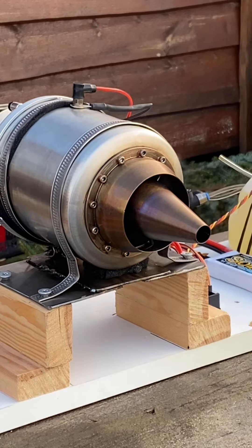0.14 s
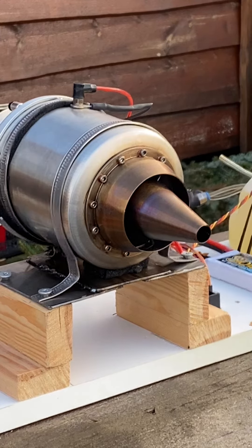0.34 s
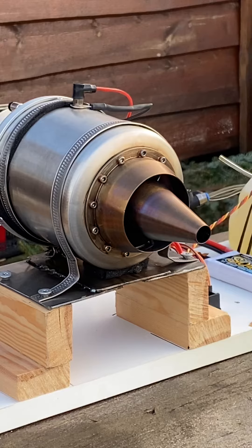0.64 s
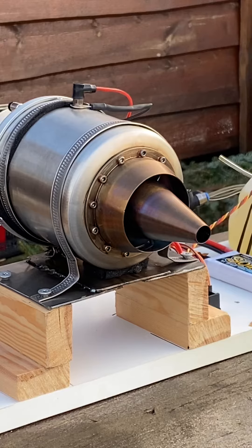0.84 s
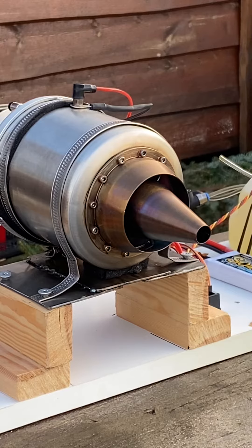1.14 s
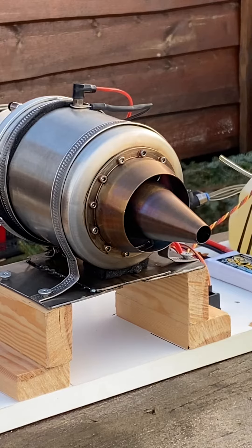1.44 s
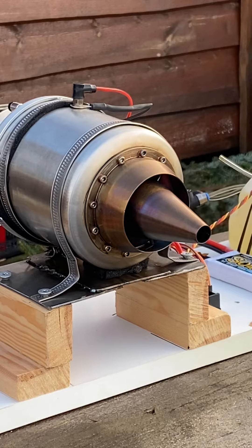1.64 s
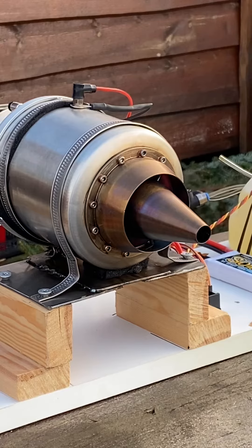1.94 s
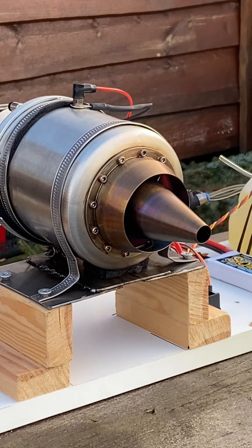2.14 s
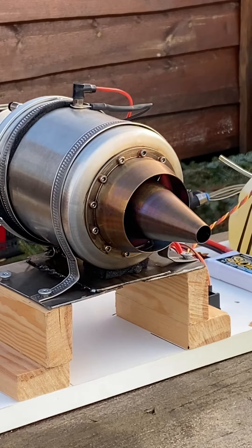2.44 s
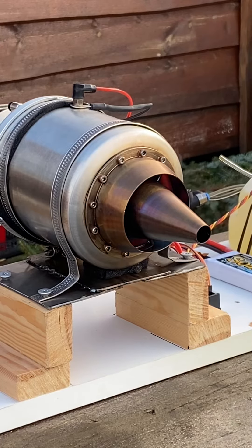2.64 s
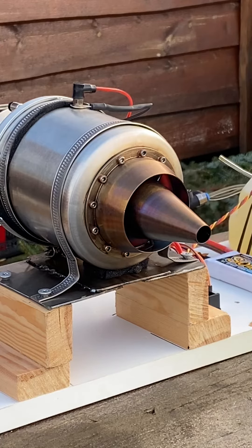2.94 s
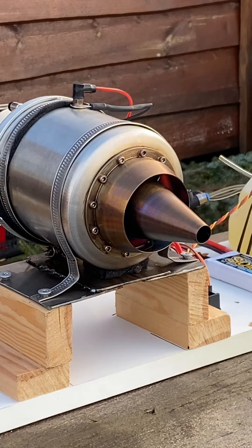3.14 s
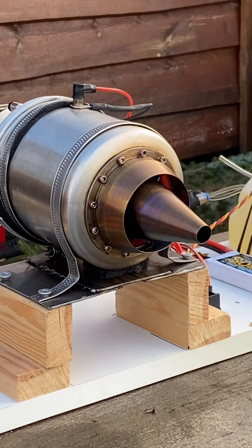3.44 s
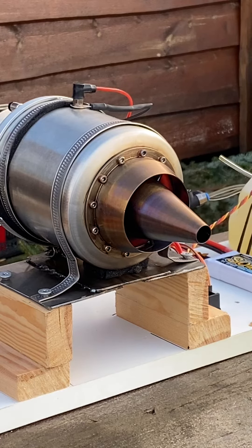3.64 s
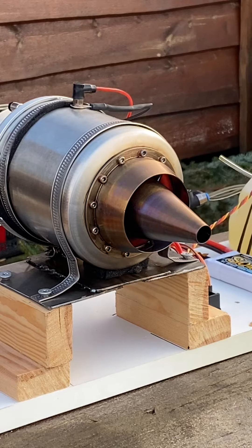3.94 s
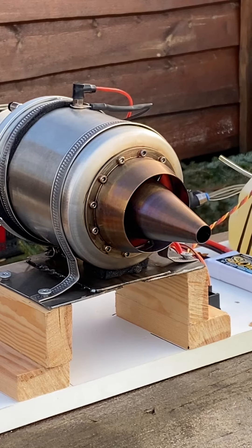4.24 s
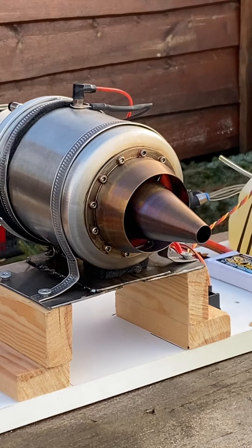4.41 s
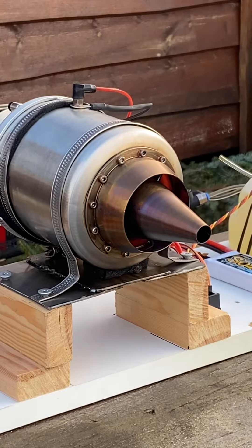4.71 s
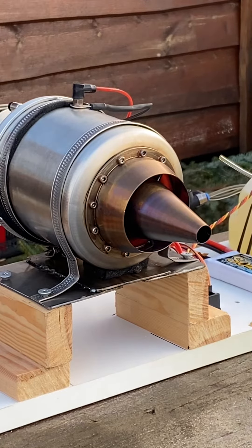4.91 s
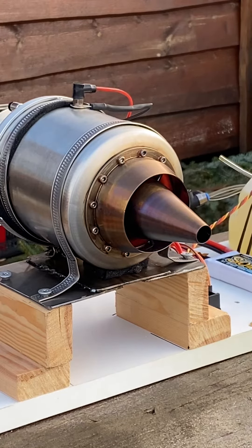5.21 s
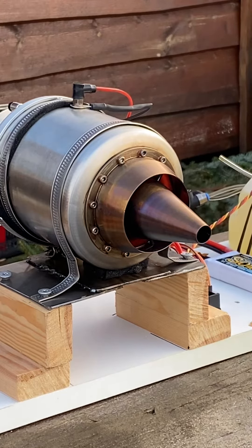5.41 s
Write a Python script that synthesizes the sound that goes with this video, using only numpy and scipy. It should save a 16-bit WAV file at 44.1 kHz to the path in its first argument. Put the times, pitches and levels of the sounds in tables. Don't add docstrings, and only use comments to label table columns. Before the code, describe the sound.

A small jet engine, already running, speeds up in a yard. A dominant low-mid combustion roar fluctuates unevenly and slowly eases back, with bright jet hiss above it. Thin, fluttering whistles from blades and bearings glide upward together throughout, swelling and fading. A faint gulp comes early, two soft low thumps past the middle. Close phone microphone in stereo, concrete below giving a short reflection; it ends still climbing.

```python
import sys
import numpy as np
from scipy import signal
from scipy.fft import rfft, irfft, next_fast_len
from scipy.io import wavfile
from scipy.ndimage import uniform_filter1d, map_coordinates

SR = 44100
rng = np.random.default_rng(int(sys.argv[2]) if len(sys.argv) > 2 else 0)


def volts_from_decibels(level):
    exponent = np.asarray(level, float) / 20
    return 10 ** exponent


def int16_out(signal):
    q = np.round(np.clip(np.atleast_2d(signal).T, -1, 1) * 32767)
    wavfile.write(sys.argv[1], SR, q.astype(np.int16))


N = 245637
IDLE_HZ = 218

# [t/s, f/Hz]
SHAFT = [(0, 217.8), (.2, 222.2), (.8, 238.4), (1.3, 252.1), (1.8, 266.1), (2.0, 272), (2.4, 284.8),
         (2.7, 294.1), (3.0, 302.9), (3.2, 308.4), (4.3, 336.6), (4.5, 342.1), (4.6, 345), (4.8, 351.8),
         (5.0, 359), (5.3, 368.2), (5.4, 371.1), (5.57, 375)]
# [t/s, level/dB]
FLOW = [(0, -15), (.15, -16.5), (.95, -14.5), (1.3, -16), (2.85, -17), (3.1, -17.5), (4.6, -19),
        (5.2, -18.5), (5.57, -19)]
# [t/s, peak level/dB, f/Hz]
COUGHS = [
    (.755, -26, 70),
    (3.295, -17, 120),
    (3.635, -14, 115),
]

# [f/Hz, level/dB]
ROAR_COLOUR = [(59, -74), (100, -15.5), (192, -1.5), (292, -1.5), (385, 0), (579, -5), (746, -11.5),
               (815, -16), (994, -15), (1210, -25.5), (1400, -37.5), (1820, -30), (3080, -120)]
JET_COLOUR = [(900, -38), (1400, -10), (1700, -4.5), (2100, -2), (3000, -7.5), (3700, -5), (4050, -7),
              (4500, -6.5), (5400, -5.5), (6000, -11), (6600, -32)]
HISS_COLOUR = [(4000, -40), (5500, -8), (6100, 0), (6700, -1), (7500, 1.5), (8200, -2), (8700, -.5),
               (9300, -2), (10200, -4), (11100, -1), (11600, -5), (12100, -2), (12700, -4), (13300, -.5),
               (16000, -3)]
RUMBLE_COLOUR = [(15, -56), (25, -55), (48, -7.5), (81, -5.5), (110, -4), (140, -2), (240, -120)]

# [level/dB, shaft f/Hz at loudest, spread f/Hz]
COMPRESSOR = [(-40, 237, 6), (-40, 248, 5), (-37, 265, 4), (-29.5, 293, 17), (-34, 315, 5), (-37, 331, 4),
              (-34, 340, 4), (-35, 356, 6), (-30, 369, 6)]
TURBINE = [(-39, 219, 6), (-34, 239, 12), (-37, 265, 10), (-44, 301, 8), (-37, 319, 10), (-40, 339, 6),
           (-40, 370, 10)]
SUM_TONE = [(-44, 224, 3), (-47, 239, 4), (-45, 303, 5), (-42, 314, 4), (-38, 326, 4), (-37, 344, 4),
            (-43, 357, 7), (-33, 370, 5)]
OVERTONE = [(-36, 218, 5), (-43, 229, 7), (-46, 245, 5), (-35, 263, 5), (-36, 272, 4), (-36, 281, 6),
            (-38, 304, 7), (-33, 330, 11)]
WHINE = [(-43, 224, 3), (-47, 237, 6), (-40, 245, 4), (-39, 256, 4), (-41, 264, 3), (-37, 277, 5),
         (-43, 291, 3), (-34.5, 305, 6), (-36, 314, 3), (-38, 324, 5), (-39, 336, 7), (-47, 353, 8)]
# [shaft multiple, level/dB between swells, swells]
LEADS = [
    (12, -48, COMPRESSOR),
    (23, -50, TURBINE),
    (35, -57, SUM_TONE),
    (46, -52, OVERTONE),
    (43.2, -54, WHINE),
]
# [t/s, half-length t/s, level/dB]
NULLS = [
    (1.0, .05, -6),
    (1.58, .04, -8),
    (3.8, .05, -9),
    (4.32, .03, -7),
    (4.665, .045, -16),
]

# [shaft multiple, level/dB, shaft f/Hz at loudest, spread f/Hz]
BLADES = [(6, -44, 349, 32), (16, -45, 340, 18), (24, -44, 348, 16), (36, -50, 304, 42), (37, -43, 357, 29),
          (38, -44, 352, 10), (42, -53, 334, 23), (44, -46, 329, 12), (45, -47, 343, 12),
          (57.07, -53, 242, 20), (71.09, -51, 220, 2)]
BEARINGS = [(21.84, -52, 328, 36), (28.05, -50, 350, 30), (28.78, -49, 261, 37), (31.31, -49, 360, 16),
            (35.74, -43, 311, 11), (36.26, -45, 340, 40), (38.25, -50, 309, 41), (42.19, -44, 335, 34),
            (49.12, -45, 305, 18), (50.13, -43, 284, 26), (51.4, -39, 248, 22), (52.12, -49, 264, 26),
            (53.39, -52, 255, 23), (54.4, -48, 262, 18), (56.06, -50, 274, 15), (56.44, -52, 253, 16),
            (57.33, -50, 248, 21), (58.34, -38, 236, 13), (59.6, -43, 227, 5), (60.33, -38, 237, 8),
            (61.34, -45, 236, 8), (64.29, -44, 237, 8), (65.3, -45, 230, 5), (65.55, -53, 233, 6),
            (66.54, -42, 225, 3), (67.27, -43, 223, 3)]
FAINT = [(15, -52, 330, 40), (18, -54, 320, 40), (21.09, -47, 368, 9), (33.82, -55, 240, 30),
         (39.26, -52, 275, 15), (40.1, -54, 275, 15), (47.1, -52, 320, 15)]
AGAIN = [(24, -47, 257, 12), (28.05, -48, 270, 18), (31.31, -50, 230, 16), (35.74, -46, 364, 14),
         (36.26, -44, 296, 7), (37, -49, 302, 12), (50.13, -45, 231, 12)]

# [f/Hz, phase/rad]
LEFT_LEAD = [(0, 0), (200, -.13), (400, -.35), (1300, -.4), (1850, 0), (2450, .54), (3000, .3), (4000, .35),
             (4450, .7), (4950, .3), (5250, 1.2), (6600, 2.1), (7200, 3.1), (7900, 4), (9300, 5.05),
             (10300, 6.3), (11370, 7.25), (12750, 8.4), (13430, 9.4), (14100, 10.3), (15900, 11.9)]
# [f/Hz, level/dB]
LEFT_LEVEL = [(100, 0), (380, 2), (650, 0), (1000, 1.7), (1300, 2), (1600, 0)]
# [f/Hz, correlation/1]
ALIKE = [(100, .999), (500, .98), (1300, .9), (2000, .97), (5000, .96), (9000, .9), (16000, .86)]
# [f/Hz, level/dB]
GATE = [(130, -19), (250, -25), (1250, -22), (1400, -11), (5000, -11), (5600, -5.5), (16000, -5.5)]
GATE_BANDS = [0, 4, 8, 16, 24, 32, 40, 48, 56, 64, 72, 80, 88, 96, 108, 120, 132, 144, 160, 176, 196, 216, 240, 264, 292, *range(320, 1025, 32)]


def unit(x):
    return x / np.sqrt(np.mean(x ** 2) + 1e-20)


def along(points, hz):
    f, v = np.transpose(points)
    return np.interp(np.log(hz + 1), np.log(f + 1), v)


def curve(rows):
    return np.interp(np.arange(N) / SR, *np.transpose(rows))


def wobble(rate):
    knots = rng.standard_normal(int(N * rate / SR) + 4)
    coarse = map_coordinates(knots, [np.arange(0, N + 64, 64) * rate / SR])
    return np.interp(np.arange(N), np.arange(len(coarse)) * 64, coarse)


def filtered(x, response):
    m = next_fast_len(N + 8192)
    return irfft(rfft(x, m) * response(np.fft.rfftfreq(m, 1 / SR)), m)[..., :N]


def rush(response, patchy_db):
    z = signal.stft(rng.standard_normal((2, N)), nperseg=512)[2]
    field = uniform_filter1d(rng.standard_normal(z.shape[1:]), size=6, axis=0)
    field = uniform_filter1d(field, size=10, axis=1)
    pair = signal.istft(z * volts_from_decibels(patchy_db * unit(field)), nperseg=512)[1][:, :N]
    return unit(filtered(pair, response))


def ground(hz, notch_hz=1350, share=0.32, dull_hz=4500):
    bounce = share / (1 + (hz / dull_hz) ** 2)
    return 1 + bounce * np.exp(-1j * np.pi * hz / notch_hz)


def combustion_roar(shaft, surge):
    deep = rush(lambda hz: volts_from_decibels(along(ROAR_COLOUR, hz)), patchy_db=0.8)
    upper = filtered(deep, lambda hz: np.log2(np.clip(hz, 60, 1200) / 330))
    tilt_db = -0.69 + 0.88 * (shaft - IDLE_HZ) / 100
    return volts_from_decibels(curve(FLOW) + 0.77 * surge) * (deep + tilt_db / 5.5 * upper)


def jet_noise(shaft, surge):
    burn_db = curve(FLOW) + 2 * (shaft - IDLE_HZ) / 100
    catching_db = -1 * np.exp(-(shaft - IDLE_HZ) / 11)
    jet_db = -29.5 + 0.73 * (burn_db - burn_db.mean()) + catching_db
    noise = rush(lambda hz: volts_from_decibels(along(JET_COLOUR, hz)) * ground(hz), patchy_db=0.65)
    jet = volts_from_decibels(jet_db + 3.5 + 0.27 * surge) * noise
    filled_hz = 265
    hollow = 0.35 * np.sqrt(np.clip((filled_hz - shaft) / (filled_hz - IDLE_HZ), 0, 1))
    return jet - hollow * filtered(jet, lambda hz: np.exp(-((hz - 3700) / 600) ** 2))


def nozzle_hiss(shaft, surge):
    hiss_db = -26 - 4.5 * np.exp(-((shaft - 290) / 64) ** 2)
    gain = volts_from_decibels(hiss_db + 0.6 * wobble(15) + 0.3 * surge)
    return gain * rush(lambda hz: volts_from_decibels(along(HISS_COLOUR, hz)), patchy_db=0.8)


def spool(shaft):
    t = np.arange(N) / SR
    turns = np.cumsum(shaft) / SR + 0.002 * wobble(60)

    def swell(db, best_hz, spread_hz):
        return db - 4.3 * ((shaft - best_hz) / spread_hz) ** 2

    def tone(k, db, flutter_db):
        level = volts_from_decibels(db + 3 + flutter_db * wobble(30))
        return level * np.sin(2 * np.pi * k * turns + 0.4 * wobble(30))

    out = np.zeros(N)
    for i, (k, quiet_db, swells) in enumerate(LEADS):
        power = volts_from_decibels(2 * quiet_db) + sum(volts_from_decibels(2 * swell(*row)) for row in swells)
        db = 10 * np.log10(power)
        if i == 0:
            db = db + sum(dip * np.exp(-((t - s) / half) ** 4) for s, half, dip in NULLS)
        skirt = 1 + 0.007 * k * wobble(250)
        out += skirt * tone(k, db + 0.3, flutter_db=1.2)

    for k, db, best_hz, spread_hz in BLADES + BEARINGS + FAINT + AGAIN:
        level_db = np.maximum(swell(db, best_hz, spread_hz), db - 14)
        in_band = k * shaft < SR / 2.4
        out += in_band * tone(k, level_db + 1.5 + (k > 56), flutter_db=2.2)
    return out


def coughs():
    out = np.zeros(N + SR)
    t = np.arange(SR // 8) / SR
    for s, db, hz in COUGHS:
        envelope = volts_from_decibels(db + 6 - 60 * t / 0.075) * (1 - np.exp(-t / 0.006))
        out[round(s * SR):][:len(t)] += envelope * np.sin(2 * np.pi * hz * t)
    return out[:N]


def rumble():
    return volts_from_decibels(-36 - 3.5) * rush(lambda hz: volts_from_decibels(along(RUMBLE_COLOUR, hz)), patchy_db=1.5)


def scene():
    shaft = curve(SHAFT)
    surge = wobble(10)
    common, other = (combustion_roar(shaft, surge) + jet_noise(shaft, surge)
                     + nozzle_hiss(shaft, surge) + rumble())

    def spread(hz):
        return np.arccos(np.clip(along(ALIKE, hz), -1, 1)) / 2

    def port(hz):
        lead = np.exp(0.5j * np.interp(hz, *np.transpose(LEFT_LEAD)))
        return lead * volts_from_decibels(along(LEFT_LEVEL, hz) / 2)

    mid = filtered(common, lambda hz: np.cos(spread(hz))) + spool(shaft) + coughs()
    side = filtered(other, lambda hz: np.sin(spread(hz)))
    return filtered(np.array([mid + side, mid - side]), lambda hz: np.array([port(hz), 1 / port(hz)]))


def stereo_gate(x):
    delay = 124
    pair = np.pad([x[0] + x[1], x[0] - x[1]], ((0, 0), (delay, 0)))
    hz, _, z = signal.stft(pair / 2, SR, nperseg=2048)
    power = uniform_filter1d(np.add.reduceat(abs(z) ** 2, GATE_BANDS, axis=1), size=2, axis=2)

    frame = np.minimum(np.arange(z.shape[2]), N // 1024)
    drift_db = 0.8 * wobble(20)[::1024][frame]
    threshold_db = along(GATE, hz[GATE_BANDS])[:, None] + drift_db
    kept = power > power[::-1] * volts_from_decibels(2 * threshold_db)

    widths = np.diff([*GATE_BANDS, len(hz)])
    line_power = np.repeat(power.max(0) / widths[:, None], widths, axis=0)
    floor = line_power * volts_from_decibels(2 * along(GATE, hz) - 5)[:, None]
    z = z * np.repeat(kept, widths, axis=1) * (abs(z) ** 2 > floor)
    both, apart = signal.istft(z, SR, nperseg=2048)[1][:, delay:N + delay]
    return np.array([both + apart, both - apart])


def top_cut(x):
    return signal.sosfilt(signal.butter(12, 16360, fs=SR, output="sos"), x)


def record(dry):
    limited = filtered(dry, lambda hz: hz < 15720)
    mix = stereo_gate(limited)
    return top_cut(mix)


dry = scene()
out = record(dry)
int16_out(out)
```